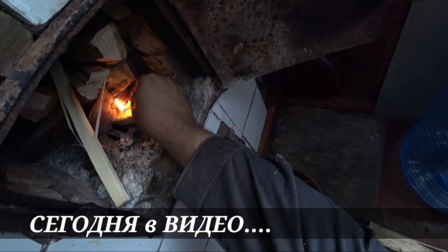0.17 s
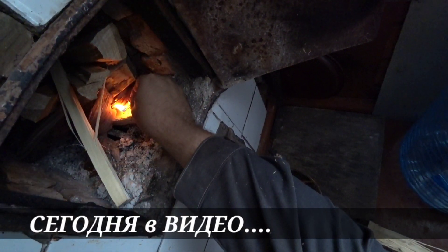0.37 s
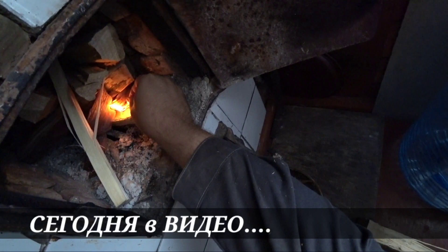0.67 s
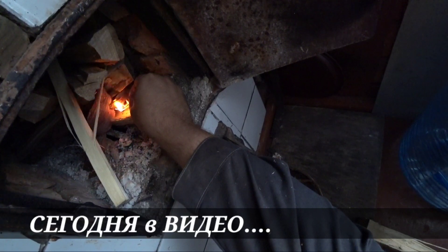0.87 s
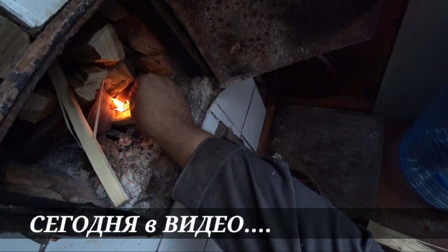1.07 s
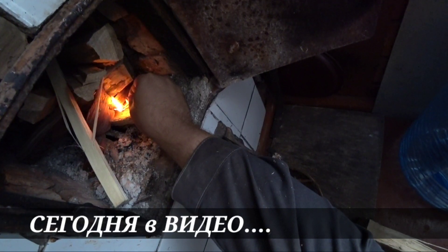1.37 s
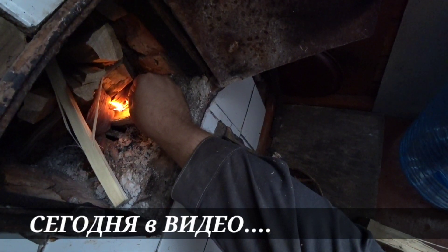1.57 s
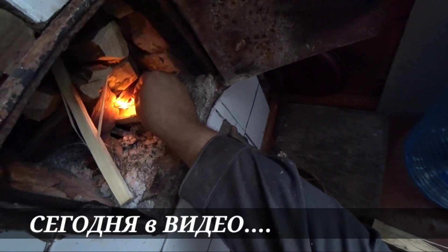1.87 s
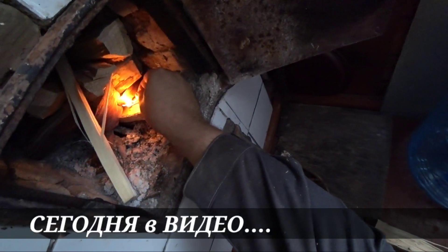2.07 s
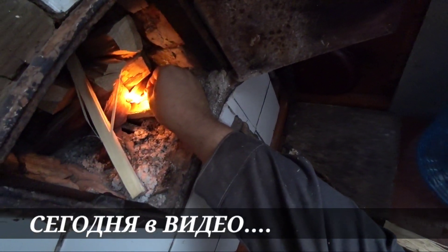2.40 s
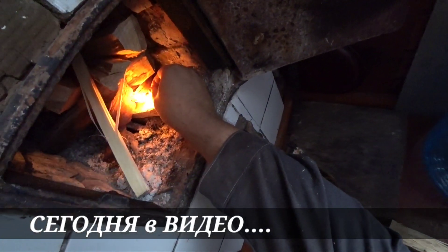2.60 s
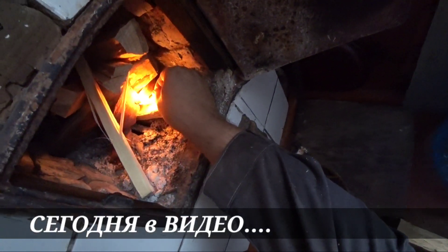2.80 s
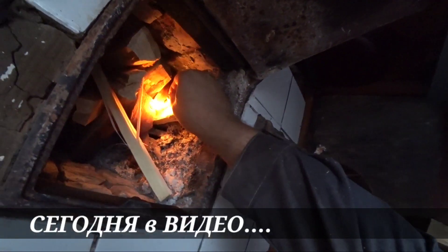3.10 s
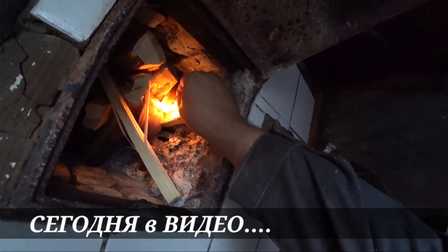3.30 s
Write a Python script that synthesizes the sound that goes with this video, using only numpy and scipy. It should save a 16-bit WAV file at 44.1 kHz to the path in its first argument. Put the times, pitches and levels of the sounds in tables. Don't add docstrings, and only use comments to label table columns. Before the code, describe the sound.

Thin kindling crackles as it catches, close to a small microphone; light ticks come first, then quicker cracks with woody knocks, and finally sharp bright pops with a short boxy metal-stove ring.

```python
import sys
import numpy as np
from scipy import signal
from scipy.fft import rfft, irfft
from scipy.io import wavfile

SR = 44100
rng = np.random.default_rng(int(sys.argv[2]) if len(sys.argv) > 2 else 0)


def pcm_store(signal):
    levels = np.round(np.clip(np.atleast_2d(signal), -1, 1) * 32767)
    wavfile.write(sys.argv[1], SR, levels.astype(np.int16).T)


def volts_from_db(level):
    exponent = np.asarray(level, float) / 20
    return 10 ** exponent


N = 152145
OPPOSITE_PORTS = np.array([[1], [-1]])
BURST_S = 0.0013


def evened(x):
    return x / np.sqrt(np.mean(x ** 2) + 1e-20)


def read(points, hz):
    f, value = np.transpose(points)
    return np.interp(np.log(hz + 1), np.log(f + 1), value)


def resonate(x, hz, width_hz):
    return signal.lfilter(*signal.iirpeak(min(hz, 0.45 * SR), hz / width_hz, SR), x)


def edge(x, kind, edge_hz, order):
    return signal.sosfilt(signal.butter(order, edge_hz, kind, fs=SR, output="sos"), x)


def body(x, modes, kind, edge_hz):
    click = np.eye(1, 2048)[0]
    ring = sum(volts_from_db(db) * resonate(click, hz, width_hz) for hz, width_hz, db in modes)
    ring = edge(ring, kind, edge_hz, order=3)
    return signal.oaconvolve(x, ring / abs(ring).max())[:N]


def hiss(shape):
    gain = volts_from_db(read(shape, np.fft.rfftfreq(N, 1 / SR)))
    return evened(irfft(rfft(rng.standard_normal(N)) * gain, N))


# pitch_hz [Hz], density_db [dB]
RUMBLE_SPECTRUM = [(12, 0), (28, 2.5), (48, -8), (95, -11.5), (200, -19), (600, -37)]
# pitch_hz [Hz], density_db [dB per Hz]
COMMON_SPECTRUM = [(100, -16), (330, 5), (1400, 1), (2300, 2), (3300, -4), (7350, -4.5), (7900, -9),
                   (15500, -13)]


def room_noise():
    return volts_from_db(-61.5) * hiss(RUMBLE_SPECTRUM) + volts_from_db(-66) * hiss(COMMON_SPECTRUM)


# pitch_hz [Hz], density_db [dB per Hz]
OPPOSITE_SPECTRUM = [(8.8, -50), (15, -21.5), (399, -7), (1110, -7.5), (4040, -21), (7050, -19),
                     (8920, -26), (14700, -33), (16500, -64)]


def port_hiss():
    return volts_from_db(-60.5) * hiss(OPPOSITE_SPECTRUM) * OPPOSITE_PORTS


def hum():
    return volts_from_db(-67) * evened(resonate(rng.standard_normal(N), 64, 12))


# start_s [s], level_db [dB of the fine crackle]
FLAME_GROWTH = [
    (0, -69.5),
    (1.6, -65.5),
    (2.5, -54.5),
    (3.45, -53.5),
]


def flame_db():
    return np.interp(np.arange(N) / SR, *np.transpose(FLAME_GROWTH))


def flutter():
    pitch_hz, width_hz = 108, 104
    flame = resonate(rng.standard_normal(N), pitch_hz, width_hz)
    flame = evened(resonate(flame, pitch_hz, width_hz))
    return flame * volts_from_db(-15 + flame_db())


# start_s [s], level_db [dB], width_s [s]
GRATE_KNOCK = (.812, -34.5, 0.000098)


def knock():
    start_s, level_db, width_s = GRATE_KNOCK
    u = np.clip((np.arange(N) / SR - start_s) / width_s, 0, 60)
    return -volts_from_db(level_db) * u ** 2 * (4 - u) * np.exp(-u)


# start_s [s], level_db [dB]
WOODY_BLOWS = [
    (1.8833, -47),
    (2.2521, -52),
    (2.4519, -34),
    (2.4987, -42),
    (2.9206, -36.5),
]
# pitch_hz [Hz], width_hz [Hz], level_db [dB]
THICK_SPLINT_MODES = [(1650, 210, 0), (2370, 570, 0)]


def thocks():
    start_s, level_db = np.transpose(WOODY_BLOWS)
    blows = np.zeros(N)
    blows[np.round(start_s * SR).astype(int)] = volts_from_db(level_db)
    return body(blows, THICK_SPLINT_MODES, "high", 1000)


THUMP_DB = 2.5
# start_s [s], level_db [dB]
SETTLING_THUDS = [(0.813, -40.5), (1.110, -51), (1.746, -53.5), (1.821, -50), (2.296, -52), (2.387, -55),
                  (2.645, -45.5), (2.747, -44.5), (2.935, -53), (3.007, -50), (3.108, -46.5), (3.116, -54),
                  (3.307, -45.5), (3.356, -57), (3.373, -48), (3.387, -49), (3.415, -53)]


def thuds():
    drive = np.zeros(N)
    for start_s, level_db in SETTLING_THUDS:
        drive[round(start_s * SR)] -= volts_from_db(level_db + THUMP_DB)
    return drive


# pitch_hz [Hz], width_hz [Hz], level_db [dB]
FIREBOX_MODES = [(428, 70, 1.5), (500, 680, -1.5), (863, 90, -3)]


def firebox_thump(drive):
    top_hz = 955
    return edge(body(drive, FIREBOX_MODES, "low", top_hz), "band", (260, 1.15 * top_hz), order=2)


# pitch_hz [Hz], t60_s [s]
FIREBOX_DECAY = [(300, 0.078), (1500, 0.089), (8000, 0.053)]


def firebox(x):
    taps = np.zeros((2, 8192))
    at = np.arange(50, 8160, 16) + rng.integers(0, 16, (2, 507))
    np.put_along_axis(taps, at, rng.choice([-1., 1.], at.shape), 1)
    hz, t, z = signal.stft(taps, SR, nperseg=128)
    decay = volts_from_db(-60 * t / read(FIREBOX_DECAY, hz)[:, None])
    tail = signal.istft(z * decay, SR, nperseg=128)[1]
    tail = tail / np.linalg.norm(tail[0])
    mid, side = signal.fftconvolve(x[None], tail, axes=1)[:, :N]
    return volts_from_db(-13) * mid + volts_from_db(-12.5) * side * OPPOSITE_PORTS


# pitch_hz [Hz], width_hz [Hz], level_db [dB]
THIN_SPLINT_MODES = [(2542, 77, 0), (3493, 730, -0.5), (4310, 390, 1.5), (4885, 360, 3.5), (6010, 6950, -9),
                     (13100, 3500, -14)]


def splint_crack(drive):
    crack = edge(body(drive, THIN_SPLINT_MODES, "high", 2636), "low", 7870, order=2)
    return crack * volts_from_db([[1.63], [-1.63]])


# pitch_hz [Hz], width_hz [Hz], level_db [dB]
TIP_MODES = [(8640, 6200, 0), (10480, 7300, 0)]
# pitch_hz [Hz], width_hz [Hz], level_db [dB]
BANG_MODES = [(1960, 610, -10), (6500, 530, -11), (8170, 1030, 7.5)]


def bright_snap(tip_drive, bang_drive):
    tips = resonate(body(tip_drive, TIP_MODES, "high", 6100), 9650, 4600)
    bright = tips + body(bang_drive, BANG_MODES, "low", 11100)
    return bright * volts_from_db([[-0.2], [0.2]])


def crackle():
    ticks_per_s, spread_db = 330, 3
    chance, size, low, high = rng.random((N, 4)).T
    level_db = flame_db() + spread_db * np.minimum(-np.log(size + 1e-9), 3)
    ticks = (chance < ticks_per_s / SR) * volts_from_db(level_db)
    spray = rng.standard_normal((8, 120)) ** 3 * np.exp(-np.arange(120) / SR / BURST_S)
    crack = np.zeros(N)
    for k, burst in enumerate(spray):
        chosen = ticks * (np.floor(high * 8) == k)
        crack += signal.oaconvolve(chosen, burst / np.linalg.norm(burst))[:N]
    thump = ticks * (2 * low - 1) * volts_from_db(-6)
    return np.array([crack, thump, crack * volts_from_db(-12), np.zeros(N)])


# start_s [s], level_db [dB], thump_db [dB re crack], snap_db [dB re crack]
LOUD_POPS = [(0.5485, -40, -12.5, -10), (0.881, -40, -33, -0.5), (1.0316, -36, -28, 0),
             (1.0421, -35, -12, -26), (1.4484, -36, -17.5, -43), (1.7775, -34, -17, -15),
             (1.8694, -41.5, -27, 0.5), (1.8833, -30, -17.5, -8), (1.9776, -38.5, -15.5, -29),
             (1.9821, -40, -21, -0.5), (2.152, -34, -32, 3), (2.2521, -33.5, -15.5, -25),
             (2.4397, -41.5, -17, 5), (2.4519, -24.5, -13, -27), (2.4793, -43, -12, -2),
             (2.4886, -33.5, -25, 5), (2.4987, -35.5, -22, -24), (2.5747, -39.5, -19, -18),
             (2.6235, -35, -14.5, -22), (2.7344, -39, -8, -33), (2.8604, -37.5, -36, 1),
             (2.9018, -36.5, -11.5, 2.5), (2.9206, -20, -23, -1.5), (2.9538, -39, -9, -0.5),
             (2.968, -35, -15, -19), (2.9942, -37, -18, -25), (3.001, -39.5, -18, -1),
             (3.0778, -35.5, -2, -20), (3.1423, -20, -15, 4), (3.1633, -39.5, -13, -11)]
# start_s [s], level_db [dB], thump_db [dB re crack]
MEDIUM_CRACKS = [(0.2146, -46, -13), (0.3104, -46.5, -16), (0.5551, -44, -14), (0.673, -41.5, -6),
                 (0.814, -44.5, -6.5), (0.8386, -45.5, -27), (0.8521, -45, -27), (0.8894, -46, -27),
                 (1.0611, -45, -24), (1.1176, -41, -30), (1.1874, -45.5, -6), (1.3699, -47, -6),
                 (1.5726, -45.5, -8), (1.595, -44.5, -17), (1.6396, -46.5, 2), (1.705, -42, -24),
                 (1.79, -42.5, -15), (1.8086, -43, -9), (1.9302, -42.5, -7.5), (1.9716, -45.5, -2),
                 (2.0093, -45.5, -9.5), (2.0601, -38.5, -10), (2.0761, -42.5, -20), (2.171, -46.5, -2),
                 (2.2152, -45.5, -5), (2.239, -42, -10.5), (2.3193, -41.5, -13), (2.3345, -48.5, -11),
                 (2.3512, -41.5, -13), (2.36, -51, -25),
                 (2.3878, -47, -20), (2.4033, -46, -2), (2.422, -42, -22), (2.4684, -45, -9),
               (2.504, -41.5, -8), (2.5452, -45.5, -5), (2.6057, -44, -18), (2.6297, -50, -24),
               (2.6754, -45.5, -31), (2.7096, -47, 1), (2.8168, -46.5, -3.5), (2.897, -43.5, -23),
               (2.943, -46, -7), (2.961, -41.5, -13), (2.9821, -45.5, -3.5), (3.0204, -45.5, -3),
               (3.033, -49, -12), (3.036, -45, -12), (3.0468, -50, -4), (3.057, -39, -10.5),
               (3.0865, -45.5, -5.5), (3.1266, -42, -6), (3.131, -44, -11), (3.1667, -41.5, -29),
               (3.2424, -42, -2), (3.2788, -42, -6.5), (3.2892, -53, 3.5), (3.3376, -43.5, -1),
               (3.401, -48, 1.5), (3.4324, -48.5, -17)]
# start_s [s], level_db [dB]
SMALL_TICKS = [(0.039, -51.5), (0.1936, -49), (.199, -50), (0.2939, -54.5), (0.401, -54), (.418, -53),
               (.454, -55), (1.0505, -49), (1.087, -54), (1.093, -58), (1.3357, -55), (1.3521, -44.5),
               (1.358, -51), (1.393, -50.5), (1.5514, -47.5), (1.5674, -49), (1.722, -50), (1.7656, -48.5),
               (1.889, -60), (1.923, -49), (1.9483, -49), (2.1918, -46.5), (2.3021, -45), (2.496, -38.5),
               (2.4363, -49), (2.443, -48), (2.5138, -48), (2.528, -54), (2.5579, -56), (2.5807, -55),
              (2.5955, -57), (2.6452, -46), (2.7459, -46), (2.7575, -50), (2.77, -54), (2.821, -50),
              (2.8283, -50), (2.8737, -50), (2.8772, -53), (2.9077, -47), (2.948, -55), (3.0422, -47),
              (3.1354, -45), (3.1856, -52.5), (3.2223, -48), (3.2679, -46), (3.3186, -52), (3.3302, -49),
              (3.3685, -50.5)]
# start_s [s], level_db [dB]
FAINT_TICKS = [(0.0301, -57), (0.1478, -57), (0.1583, -61), (0.335, -59), (0.356, -59), (0.4595, -57),
               (0.5264, -56), (0.56, -49), (0.579, -60), (0.6194, -51.5), (0.654, -55),
               (0.6755, -49.5), (0.697, -66), (0.7498, -57), (0.7818, -53.5), (0.8291, -61),
               (0.843, -53), (0.864, -58), (0.9499, -56), (1.0559, -51), (1.1033, -51), (1.1094, -55),
               (1.145, -59), (1.2168, -53), (1.2927, -64), (1.3657, -52), (1.3854, -56),
               (1.4243, -49.5), (1.432, -59), (1.562, -57), (1.5807, -52), (1.6237, -57),
               (1.6464, -62), (1.682, -51), (1.7306, -51), (1.74, -53), (1.7468, -56),
               (1.7523, -53.5), (1.7999, -49), (1.8222, -54), (1.8282, -55), (1.8318, -51),
               (1.895, -47), (1.9116, -52), (1.934, -51), (1.937, -53), (1.942, -53), (1.9558, -49),
               (1.9987, -54), (2.0693, -54), (2.0866, -49.5), (2.1169, -56), (2.1299, -57),
               (2.1421, -61), (2.1775, -50), (2.2018, -53),
               (2.272, -59), (2.2918, -53), (2.2946, -52), (2.309, -56), (2.3676, -60), (2.393, -55),
                    (2.4, -54), (2.5207, -61), (2.528, -50), (2.5682, -58), (2.5852, -57), (2.651, -57),
                    (2.681, -54), (2.7156, -52), (2.7279, -52), (2.752, -58), (2.78, -58), (2.807, -60),
                    (2.8333, -56), (2.8852, -50), (3.0176, -56), (3.0626, -55), (3.0943, -55),
                    (3.1167, -54), (3.1757, -50), (3.195, -58), (3.256, -52), (3.2619, -52), (3.273, -56),
                    (3.299, -53), (3.3423, -54), (3.4168, -58), (3.4416, -64)]


def pops():
    sharp_db, bang_db = -41, -18
    tear_s, clean = 0.0021, 0.86
    thump_lag_s, bang_lag_s = 0.00015, 0.0007
    usual_thump_db, usual_snap_db = -7.5, -1
    events = list(LOUD_POPS)
    events += [[*row, usual_snap_db] for row in MEDIUM_CRACKS]
    events += [[*row, usual_thump_db, usual_snap_db] for row in SMALL_TICKS]
    events += [[*row, -10.5, -2.5] for row in FAINT_TICKS]
    t = np.arange(200) / SR
    spray = rng.standard_normal((len(events), 200)) ** 3 * volts_from_db(-11.5)
    drive = np.zeros((4, N + 400))
    for (start_s, level_db, thump_db, snap_db), grain in zip(events, spray):
        sharp = min(volts_from_db(level_db - sharp_db), 1)
        decay_s = tear_s + (BURST_S - tear_s) * sharp
        burst = (1 - clean * sharp) * grain * np.exp(-t / decay_s) + sharp * (t == 0)
        burst = burst / np.linalg.norm(burst)
        is_bang = int(level_db + snap_db > bang_db)
        at = round(start_s * SR)
        crack_at = at + round(bang_lag_s * SR) * is_bang
        drive[0, crack_at:crack_at + 200] += volts_from_db(level_db + 9) * burst
        drive[1, round((start_s + thump_lag_s) * SR)] -= volts_from_db(level_db + thump_db + THUMP_DB)
        drive[2 + is_bang, at:at + 200] += volts_from_db(level_db + snap_db + 8.5) * burst
    return drive[:, :N]


def scene():
    crack, thump, snap, bang = pops() + crackle()
    low = firebox_thump(thump + thuds()) + knock() + thocks()
    near = splint_crack(crack) + bright_snap(snap, bang)
    fire = near + low + firebox(near.mean(0) + low)
    return fire + hum() + flutter() + port_hiss() + room_noise()


def top_cut(x):
    return signal.sosfilt(signal.butter(12, 16670, fs=SR, output="sos"), x)


def record(dry):
    mix = signal.oaconvolve(dry, signal.firwin(255, 15900, fs=SR)[None], "same")
    return top_cut(mix)


dry = scene()
out = record(dry)
pcm_store(out)
```